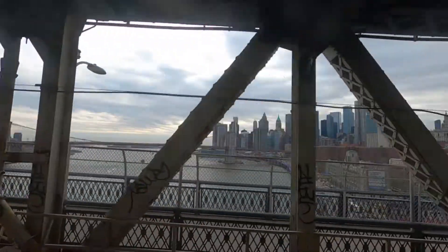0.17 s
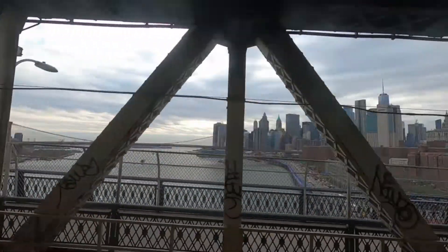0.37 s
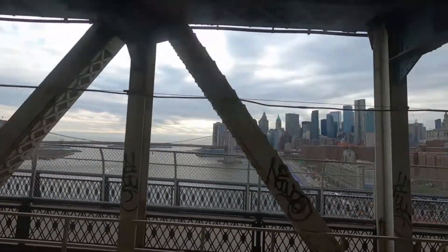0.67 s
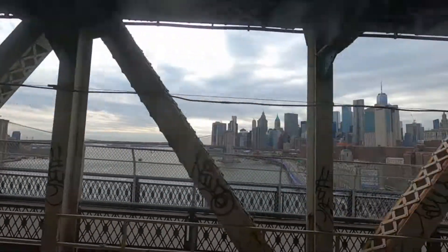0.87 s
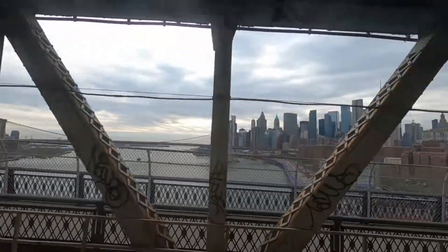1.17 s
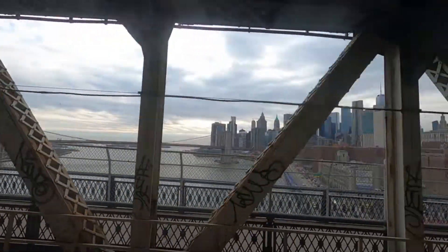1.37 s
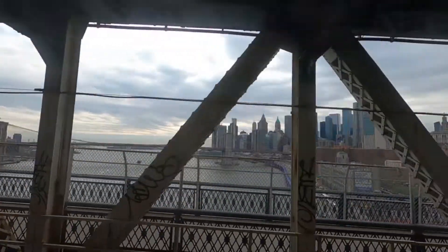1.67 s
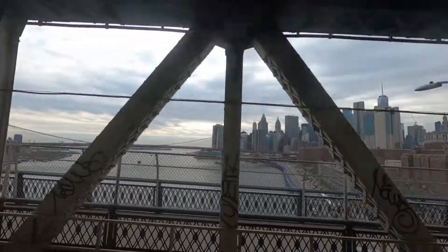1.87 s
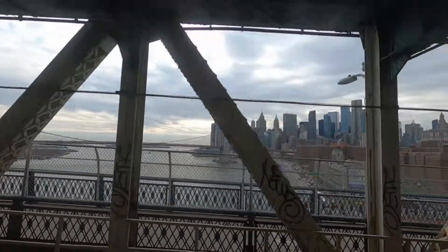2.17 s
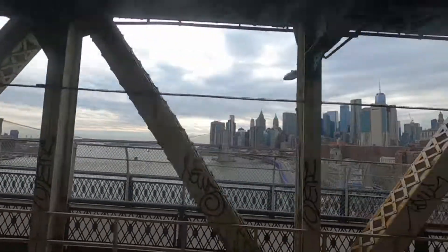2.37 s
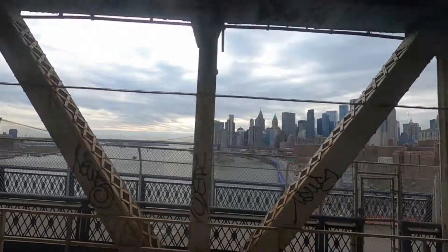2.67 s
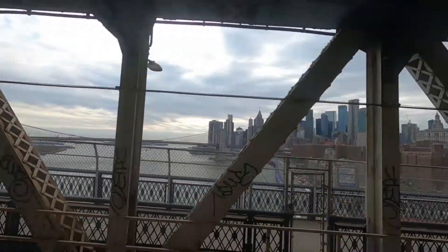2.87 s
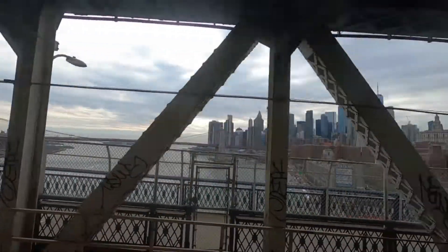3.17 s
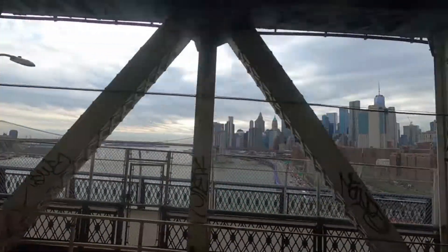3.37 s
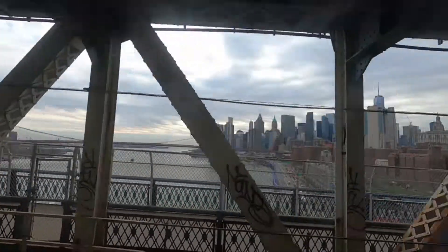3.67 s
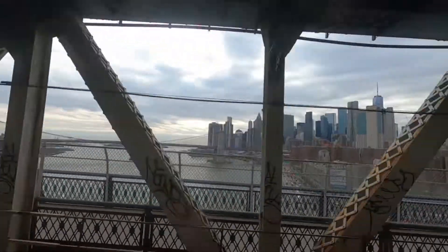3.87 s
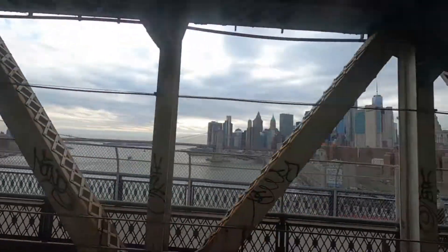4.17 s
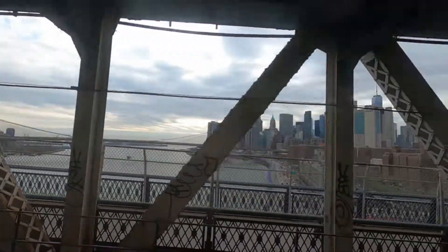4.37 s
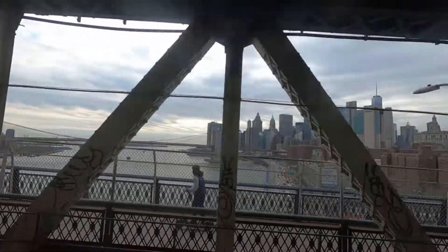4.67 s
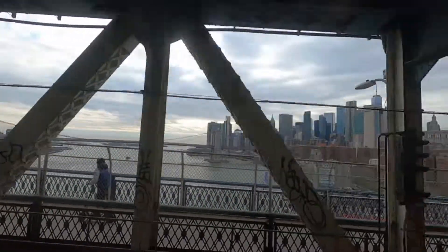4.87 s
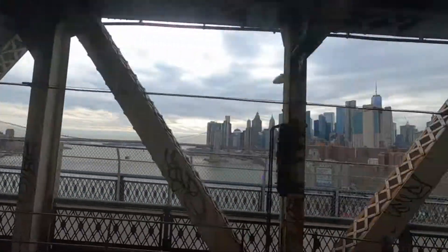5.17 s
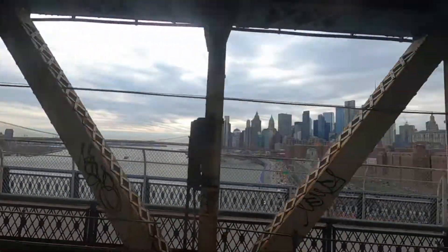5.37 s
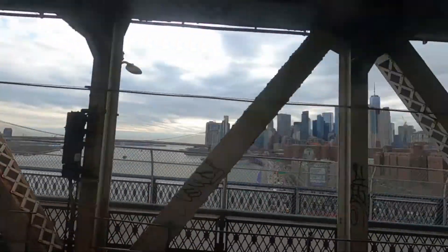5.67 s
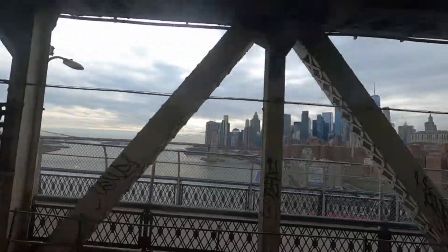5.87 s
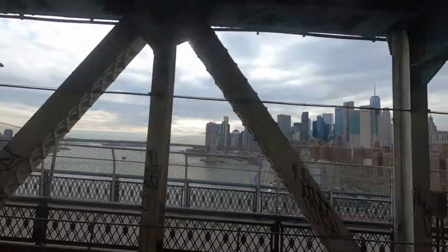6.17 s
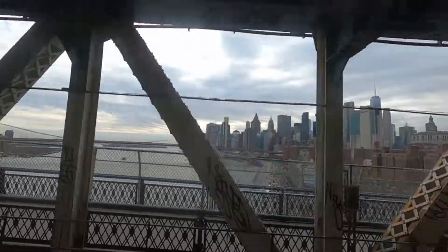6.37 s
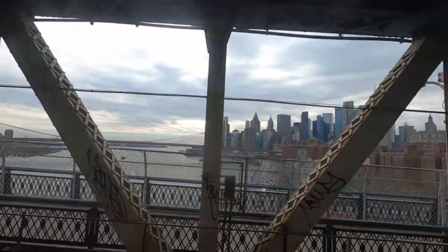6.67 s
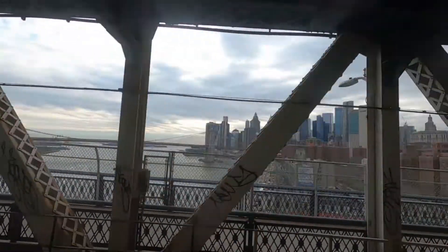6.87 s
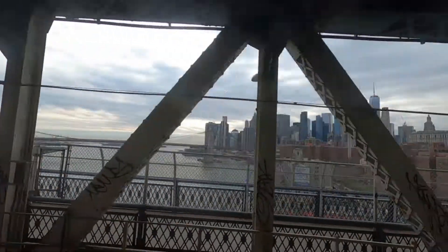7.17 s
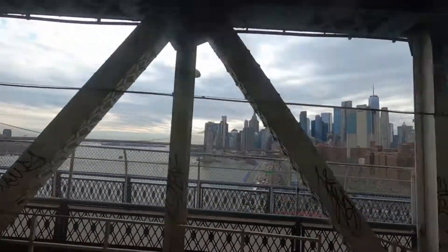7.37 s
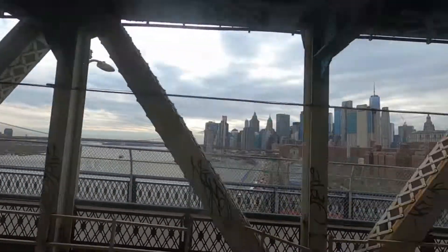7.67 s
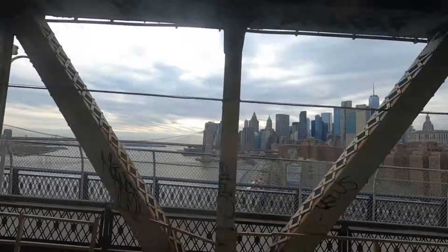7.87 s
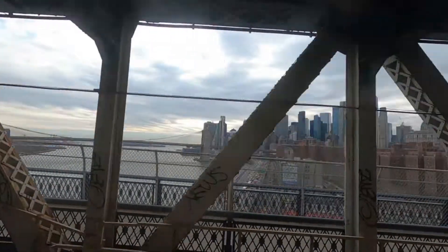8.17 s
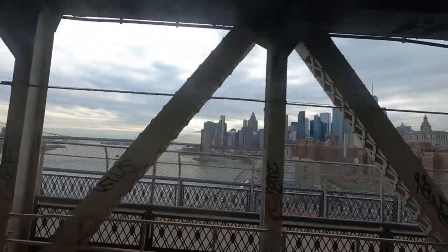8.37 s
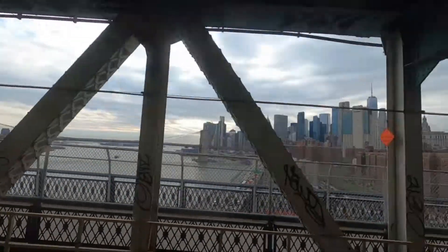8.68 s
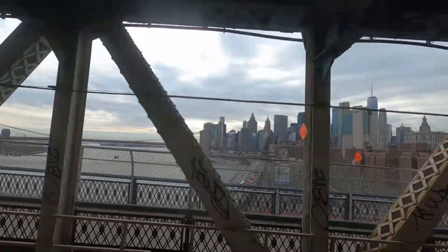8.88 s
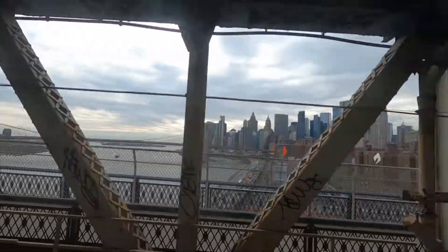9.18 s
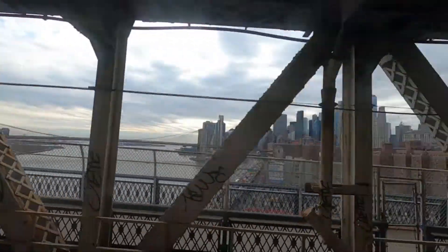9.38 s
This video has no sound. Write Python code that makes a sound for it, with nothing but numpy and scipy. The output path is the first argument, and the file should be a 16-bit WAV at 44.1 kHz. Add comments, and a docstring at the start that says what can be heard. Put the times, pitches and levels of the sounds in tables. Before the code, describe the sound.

A continuous, loud carriage ride recorded at the window. Heavy low rumble and a wavering panel hum lie behind a gritty steel-on-steel roar that swells every fraction of a second. Thuds and clashes mark rail joints around two to four, six and eight seconds; a few small metal clinks and faint flange squeaks pass. The train neither slows nor stops.

```python
"""Inside a subway car on a steel bridge, heard at the window while the train rolls steadily.
Farthest back, shaped noise makes the car body rumble and boom and one wall panel drone on its resonance.
Loose fittings chatter as random noise ticks and clink as clustered sines; a flange chirps as a falling sine
and squeaks as band noise. In front, noise coloured by wheel modes roars in surges and sings, and rail
joints knock as decaying noise."""
import sys
import numpy as np
from scipy import signal
from scipy.fft import rfft, irfft
from scipy.io import wavfile
from scipy.ndimage import uniform_filter1d, minimum_filter1d

SR = 44100
rng = np.random.default_rng(int(sys.argv[2]) if len(sys.argv) > 2 else 0)


def put_to_file(sound):
    """Save the sound as 16-bit audio at rate SR, in the file named by the first command-line argument."""
    columns = np.atleast_2d(sound).T  # one column per channel
    safe = np.clip(columns, -1, 1)
    whole_steps = np.round(safe * 32767)
    wavfile.write(sys.argv[1], SR, whole_steps.astype(np.int16))


N = 419832
HZ = np.fft.rfftfreq(N, 1 / SR)
TIME = np.arange(N) / SR


def gain_of(db):
    """Decibels to amplitude."""
    return 10 ** (np.asarray(db) / 20)


def evened(x):
    """Scales to an rms of 1."""
    return x / np.sqrt(np.mean(x ** 2) + 1e-20)


def follow(curve):
    """A curve of (t/s, value) rows at every sample."""
    return np.interp(TIME, *np.transpose(curve))


def read(points):
    """The columns of a table over frequency, at every bin, joined along log frequency."""
    hz, *columns = np.transpose(points)
    return [np.interp(np.log(HZ + 1), np.log(hz + 1), column) for column in columns]


def resonance(hz, width, bins=HZ):
    """Gain per bin of one steep resonance."""
    return 1 / (1 + (2 * (bins - hz) / width) ** 4)


def colour(points, modes=()):
    """Gain per bin: a broad shape with resonances standing on it."""
    peaks_db = sum(db / (1 + (2 * (HZ - hz) / width) ** 2) for hz, width, db in modes)
    return gain_of(read(points)[0] + peaks_db)


def drift(rate_hz):
    """Slow chance of rms 1, fading out above the rate."""
    return evened(irfft(rfft(rng.standard_normal(N)) / (1 + (HZ / rate_hz) ** 4), N))


def decay(age, t60):
    """Falls by 60 dB in t60 seconds."""
    return np.exp(-np.log(1000) * age / t60)


# the two microphone ports: [f/Hz, likeness 0-1, left lead/rad, left minus right/dB]
MICROPHONE_PORTS = [(30, .9965, 0, .6), (70, .998, -.01, .6), (130, .993, -.02, .9), (260, .977, -.06, 1.5),
                    (550, .9, -.12, 1.1), (850, .8, -.33, 1.5), (1450, .85, -.3, 1.7), (1700, .85, -.33, 3),
                    (2150, .66, -.55, 3.6), (2570, .22, -.8, -5.3), (2950, .54, -1.55, 0),
                    (3550, .47, -.9, 1), (4400, .26, -.8, -5.4), (5300, .1, -2, -2), (6000, .3, -3.7, -1),
                    (7000, .33, -3.4, 2.3)]


def in_cabin(gain, drive=None):
    """Colours two drives (noise if none is given) and spreads them over the ports: bass alike, treble diffuse."""
    near, diffuse = rfft(rng.standard_normal((2, N)) if drive is None else drive)
    same, lead, tilt_db = read(MICROPHONE_PORTS)
    same = np.clip(same, -1, 1)
    left = near * gain_of(tilt_db / 2)
    right = (same * near + np.sqrt(1 - same ** 2) * diffuse) * np.exp(-1j * lead)
    return evened(irfft(gain * np.array([left, right * gain_of(-tilt_db / 2)]), N))


def steadied(x, seconds, amount):
    """Evens out the chance swells of a vibration that is driven without pause."""
    power = (abs(signal.hilbert(x)) ** 2).mean(0)
    power = uniform_filter1d(power, max(int(seconds * SR), 1))
    return evened(x / (abs(power) + 1e-6) ** (np.clip(amount, 0, 1) / 2))


def wandering(x, share, rate_hz):
    """Lets all the resonances of a vibration slide a little up and down as the load shifts."""
    warped = TIME + np.cumsum(share * drift(rate_hz)) / SR
    return np.array([np.interp(warped, TIME, port, period=N / SR) for port in x])


# level of the deep rumble, before its trim: [t/s, level/dB]
RUMBLE_LEVEL = [(0, -20), (.24, -16.5), (.5, -19.5), (.95, -19.5), (1.17, -17), (1.82, -21), (2.15, -17),
                (2.5, -18), (3.1, -18), (3.65, -18.5), (4.05, -20), (4.38, -16.5), (4.68, -19), (4.85, -18),
                (5.3, -18), (5.78, -20.3), (6.1, -19.5), (6.45, -18.5), (6.95, -20), (7.27, -17.5),
                (7.48, -18.5), (8.12, -20.5), (8.32, -18.5), (8.75, -19.5), (9.2, -16), (9.42, -21)]
# the bridge shakes the car, panel boom before its trim: [t/s, level/dB]
SHAKE_LEVEL = [(0, -22.5), (.3, -22.5), (0.7, -22), (.82, -20), (1.05, -19.5), (1.17, -22), (1.34, -19),
               (1.55, -22.5), (2.1, -20.5), (2.55, -21.5), (3.1, -20.5), (3.29, -23), (3.45, -19.5),
               (3.7, -21.5), (4.05, -18.5), (4.42, -22.5), (5.12, -19.5), (5.25, -22.5), (5.45, -21),
               (5.58, -18), (5.82, -19), (6.1, -19), (6.25, -23), (6.45, -18.5), (6.68, -19), (6.98, -18),
               (7.26, -23.5), (7.42, -20), (7.8, -20), (8.2, -20), (8.5, -16.5), (8.68, -23), (8.95, -19.5),
               (9.5, -20.5)]
# broad colours of rumble and boom: [f/Hz, relative level/dB]
RUMBLE_COLOUR = [(5, -32.5), (14, -17), (26, 0.5), (55, -3), (95, -3), (120, -8), (200, -32), (600, -63)]
BOOM_COLOUR = [(60, -28.5), (105, -14), (130, -1), (200, -2), (275, -3), (355, -9), (410, -12),
               (510, -18.5), (750, -25.5), (1200, -32.5), (4000, -64)]
# modes of the cabin air and floor, then of wall and roof panels: [f/Hz, width/Hz, lift/dB]
AIR_AND_FLOOR_MODES = [(43.4, 5.7, 4.5), (75, 15, 5), (98, 12, 4)]
WALL_AND_ROOF_MODES = [(135.3, 6.2, 3), (166.6, 20, 5.5), (266, 27, 1.5), (308.2, 6, 5), (339.4, 15, 3),
                       (359, 17, 2.5)]


def car_body(rumble_trim_db=0.46, boom_trim_db=0.5, sway_db=-3.5, lump_db=0.72):
    """The track sways the whole car, shakes the cabin air into a rumble and the panels into a lumpy boom."""
    deep = colour(RUMBLE_COLOUR, AIR_AND_FLOOR_MODES)
    whole_car = 1 / (1 + (HZ / 56) ** 8)  # share of the power that is sway, below about 56 Hz
    sway = steadied(in_cabin(deep * np.sqrt(whole_car)), seconds=.11, amount=0.41)
    air = wandering(in_cabin(deep * np.sqrt(1 - whole_car)), share=.018, rate_hz=2.5)
    air = steadied(air, seconds=0.079, amount=0.32)
    rumble = evened(gain_of(sway_db) * sway + air)
    panels = in_cabin(colour(BOOM_COLOUR, WALL_AND_ROOF_MODES))
    panels = wandering(panels, share=.012, rate_hz=2.5)
    boom = steadied(panels, seconds=0.068, amount=0.45)
    rumble_db = follow(RUMBLE_LEVEL) + rumble_trim_db
    boom_db = follow(SHAKE_LEVEL) + boom_trim_db + lump_db * drift(5.0)
    return rumble * gain_of(rumble_db) + boom * gain_of(boom_db)


# the loosest wall panel drones in surges: [t/s, level/dB]
DRONE_LEVEL = [(0, -32), (0.7, -34), (0.85, -21.5), (1.15, -33.5), (2.25, -37.5), (2.48, -30), (3.12, -27),
               (3.3, -38), (3.45, -27.5), (4.15, -26.5), (4.38, -38), (4.85, -29), (5.42, -33), (5.58, -24),
               (6.05, -25.5), (6.25, -32), (6.75, -28.5), (7.4, -35), (8.35, -25), (9.1, -28.5),
               (9.5, -27.5)]
DRONE_HZ, DRONE_WIDTH_HZ = 219.3, 13.3


def drone(steadiness=.7):
    """One panel resonance, shaken without pause, hums at a fixed pitch while its level surges."""
    mode = in_cabin(resonance(DRONE_HZ, DRONE_WIDTH_HZ))
    return steadied(mode, seconds=.12, amount=steadiness) * gain_of(follow(DRONE_LEVEL))


# loose metal parts clinking: [t/s, f/Hz, level before rise and decay/dB, t60/s]
LOOSE_PART_CLINKS = [(4.48, 2480, -27, .16), (4.565, 1670, -30, 0.16), (4.972, 2680, -21.5, .09)]


def clinks(rise_s=0.0036, width_hz=45, count=5):
    """A loose part strikes once and rings briefly on a cluster of close modes."""
    out = np.zeros((2, N))
    age = np.arange(SR // 2) / SR
    for s, hz, db, t60 in LOOSE_PART_CLINKS:
        cluster_hz = hz + width_hz * np.linspace(-1, 1, count)[:, None]
        cycles = cluster_hz * age + rng.random((2, count, 1))
        ring = evened(np.sin(2 * np.pi * cycles).sum(1))
        envelope = (1 - np.exp(-age / rise_s)) * decay(age, t60)
        start = int(s * SR)
        out[:, start:start + len(age)] += gain_of(db) * ring * envelope
    return out


# bright colour of struck steel, shared by the chatter and the joints: [f/Hz, relative level/dB]
CLASH_COLOUR = [(500, -22), (1600, 0.5), (2700, -2), (4400, -7.5), (6000, -16), (8000, -19), (13000, -28)]
CHATTER_PER_S, CHATTER_DB = 54, -48.5  # mean tap rate, rms level


def chatter(contact_db, power_decay_s=0.0093, spread_db=3, growth=1.5):
    """Loose fittings tap at random, more strongly when the wheels grind."""
    tap_db = spread_db * np.minimum(rng.exponential(1, N), 3)
    taps = (rng.random(N) < CHATTER_PER_S / SR) * gain_of(tap_db)
    power = signal.lfilter([1], [1, -np.exp(-1 / (power_decay_s * SR))], taps ** 2)
    ticks = in_cabin(colour(CLASH_COLOUR), np.sqrt(power) * rng.standard_normal((2, N)))
    return gain_of(CHATTER_DB) * evened(ticks * gain_of(growth * contact_db))


# three quick slips of a flange that make one falling chirp: [t/s, length/s, level at the crest/dB]
FLANGE_SLIPS = [(5.338, 0.015, -29), (5.355, 0.022, -32), (5.376, 0.033, -38.5)]
CHIRP_HZ, CHIRP_SAG_HZ_PER_S = 3395, 850


def chirp(waver_hz=8, pan_db=2, bite_hz=22, bite_s=.014):
    """A flange sticks and slips, ringing one wheel mode that starts rough, clears and sags in pitch."""
    age = np.clip(TIME - FLANGE_SLIPS[0][0], 0, 1)
    roughness_hz = waver_hz + bite_hz * np.exp(-age / bite_s)
    hz = CHIRP_HZ - CHIRP_SAG_HZ_PER_S * age + roughness_hz * drift(150)
    slips = np.zeros(N)
    for s, length, db in FLANGE_SLIPS:
        slips += gain_of(db) * np.sin(np.pi * np.clip((TIME - s) / length, 0, 1))
    tone = np.sqrt(2) * np.sin(2 * np.pi * np.cumsum(hz) / SR)
    return slips * tone * gain_of([[pan_db / 2], [-pan_db / 2]])


# flanges rubbing on the rail: [t/s, length/s, f/Hz, width/Hz, level/dB, left minus right/dB]
FLANGE_SQUEAKS = [(0.764, 0.4, 6000, 2200, -53, 4), (2.55, 0.32, 6100, 1300, -53, 3),
                  (5.455, .09, 6130, 300, -52, 3), (5.677, 0.11, 6100, 600, -50, -1),
                  (8.857, 0.2, 4670, 1800, -48, -7)]


def squeaks():
    """A rubbing flange hisses in a band of high wheel modes."""
    out = np.zeros((2, N))
    bins = np.fft.rfftfreq(SR, 1 / SR)
    for s, length, hz, width, db, pan_db in FLANGE_SQUEAKS:
        window = signal.windows.tukey(int(length * SR), .7)
        ring = irfft(rfft(rng.standard_normal((2, SR))) * resonance(hz, width, bins))
        ring = np.array([evened(port) for port in ring[:, :len(window)]])
        start = int(s * SR)
        port_gains = gain_of([[db + pan_db / 2], [db - pan_db / 2]])
        out[:, start:start + len(window)] += ring * window * port_gains
    return out


# wheels knocking over rail joints, before rise and decay: [t/s, clash level/dB, thud level/dB, t60/s]
RAIL_JOINTS = [(2.14, -33, -33, 0.25), (3.115, -31, -19.5, 0.25), (3.962, -22.5, -23, 0.18),
               (4.24, -33, -18.5, 0.23), (6.035, -40, -32, .3), (6.28, -29, -39, 0.34),
               (8.18, -31, -18, 0.45), (8.415, -32, -34, 0.22)]
# dull colour of a knock in the floor: [f/Hz, relative level/dB]
THUD_COLOUR = [(70, -11), (170, 7), (350, 1), (550, -3.5), (900, -3.5), (1400, -10), (2500, -18),
               (6000, -52)]
# steel that rings under a knock: [f/Hz, width/Hz, lift/dB]
KNOCKED_STEEL_MODES = [(775, 30, 3.5), (907, 79, 3), (1350, 35, 10), (1640, 60, 6.5), (1800, 54, 2),
                       (2100, 40, 4.5), (2380, 35, 5), (2720, 35, 3.5)]


def joints(rise_s=0.0069):
    """Each joint sets off a clash of steel and a thud in the floor that die away through the car."""
    clash, thud = np.zeros((2, N))
    for s, clash_db, thud_db, t60 in RAIL_JOINTS:
        age = np.maximum(TIME - s, 0)
        blow = (1 - np.exp(-age / rise_s)) * decay(age, t60)
        clash += gain_of(clash_db) * blow
        thud += gain_of(thud_db) * blow
    steel = in_cabin(colour(CLASH_COLOUR, KNOCKED_STEEL_MODES))
    floor = in_cabin(colour(THUD_COLOUR, KNOCKED_STEEL_MODES))
    return clash * steel + thud * floor


# wheel modes that sing out by turns: [f/Hz, width/Hz, level above contact and singing lift/dB]
SINGING_MODES = [(1478, 57, -19.5), (1616, 30, -14), (1741, 79, -12.5), (1873, 90, -16.5), (2567, 80, -19)]
# how freely the wheel modes sing: [t/s, lift/dB]
SINGING_LIFT = [(0, -4), (0.2, 4), (0.4, -4), (1.12, 0), (1.55, -0.5), (2.3, -2), (2.52, 1), (2.95, -9),
                (3.12, 0.5), (3.6, -4), (4.12, -7), (4.65, 0), (5.1, 0), (5.4, -5), (6, 2.5), (6.22, -7.5),
                (6.45, 3.5), (7, -1), (7.7, -1), (8.3, -2), (8.58, 4.5), (8.8, -0.5), (9.08, 1), (9.25, -2),
                (9.5, 4)]


def singing(contact_db, spread_db=5.0, turn_hz=9, pan_db=2.6):
    """The rolling contact feeds now one wheel mode, now another, so the metallic ringing shifts in pitch."""
    ring = np.zeros(N)
    for hz, width, db in SINGING_MODES:
        mode = irfft(rfft(rng.standard_normal(N)) * resonance(hz, width), N)
        turns_db = spread_db * np.minimum(drift(turn_hz), 1.5)
        ring += gain_of(db) * evened(mode * gain_of(turns_db))
    ring = wandering(ring[None], share=.022, rate_hz=7)
    level_db = contact_db + follow(SINGING_LIFT)
    return ring * gain_of(level_db) * gain_of([[pan_db / 2], [-pan_db / 2]])


# how hard the wheels grind on ordinary stretches of rail, before the roar's trim: [t/s, level/dB]
ORDINARY_CONTACT = [(0, -32.5), (0.6, -33), (1.42, -31), (1.56, -36), (1.72, -31.5), (2.1, -31.5),
                    (2.35, -33), (2.55, -30), (2.85, -30.5), (3.5, -31.5), (4.3, -29.5), (4.7, -32.5),
                    (5.38, -32), (5.9, -30), (6.12, -30.5), (6.2, -31.5), (6.3, -30), (7.15, -32),
                    (7.45, -35), (8.05, -32.5), (9.5, -33.5)]
# rough stretches, each a surge of the roar before blur and growth: [t/s, length/s, lift/dB, extra hiss/dB]
ROUGH_STRETCHES = [(0.058, 0.049, 1.5, -0.5), (0.167, .25, 1, -1.5), (0.757, 0.06, 2.5, 2),
                   (0.896, .3, 1, 0), (1.643, 0.044, 1.5, 0), (2.107, 0.068, 3.5, -2),
                   (2.426, 0.091, 2, -1.5), (2.642, 0.17, 1.8, -2), (3.067, 0.12, 2, 1),
                   (3.303, 0.27, 1, 0.5), (3.942, 0.065, 3, -0.5), (4.216, 0.075, 2, -4),
                   (4.782, 0.049, 3, -3), (4.899, 0.15, 3.5, -1), (5.159, 0.095, 2.5, 1),
                   (5.423, 0.18, 2.5, 2.5), (5.665, 0.17, 2.5, 0.5), (6.003, 0.064, 4.5, -2.5),
                   (6.255, 0.12, 2.5, -4.5), (6.517, 0.1, 3.5, -3), (6.805, 0.1, 1, -0.5),
                   (7.131, 0.083, 3, -2.5), (8.133, .16, 4, -5.5), (8.374, .15, 5, -4),
                   (8.755, 0.045, 2.5, -3), (8.911, .24, 4, -3), (9.2, 0.12, 3, -3.5)]
SURGE_RISE_S, SURGE_FALL_S, SURGE_BLUR_S = 0.021, 0.079, 0.024


def grinding():
    """Contact level and extra hiss in dB: each rough stretch shifts them quickly, holds them, lets them return."""
    contact_db, hiss_db = follow(ORDINARY_CONTACT), np.zeros(N)
    for start, length, lift_db, extra_db in ROUGH_STRETCHES:
        rise = (TIME - start) / SURGE_RISE_S
        fall = 1 - (TIME - start - length) / SURGE_FALL_S
        surge = np.clip(np.minimum(rise, fall), 0, 1)
        contact_db += lift_db * surge
        hiss_db += extra_db * surge
    return uniform_filter1d(contact_db, max(int(SURGE_BLUR_S * SR), 1)), hiss_db


# broad colour of the roar: [f/Hz, relative level/dB]
ROAR_COLOUR = [(150, -19.5), (450, -0.5), (650, 0), (850, -0.5), (1200, -2.5), (1650, 0.5), (2250, -1),
               (2700, -0.5), (3400, -7), (4400, -13.5), (5400, -21), (6200, -24.5), (8000, -32),
               (13000, -38.5)]
# ringing of wheels and rails, with two hollows between the modes: [f/Hz, width/Hz, lift/dB]
WHEEL_AND_RAIL_MODES = [(800, 25, 1.5), (853, 36, -4.5), (1450, 56, 2), (1730, 190, 1.3), (2190, 60, -2),
                        (2460, 190, 1.5), (2930, 100, 2.3)]


def rolling(contact_db, hiss_db, roar_trim_db=2.5, low_growth=.72, high_growth=1.94, flutter_db=0.37):
    """Rough steel rolls on steel; harder contact is louder and also brighter."""
    usual_db = contact_db.mean()
    surge_db = contact_db - usual_db + flutter_db * drift(35)
    roar = rfft(in_cabin(colour(ROAR_COLOUR, WHEEL_AND_RAIL_MODES)))
    low = 1 / (1 + (HZ / 1100) ** 4)
    high = 1 - 1 / (1 + (HZ / 3700) ** 4)
    bands = [(low, low_growth * surge_db),
             (1 - low - high, surge_db),
             (high, high_growth * surge_db + hiss_db)]
    surging = sum(irfft(roar * band, N) * gain_of(db) for band, db in bands)
    return gain_of(usual_db + roar_trim_db) * surging


def scene():
    """Everything heard at the window."""
    contact_db, hiss_db = grinding()
    background = car_body() + drone()
    fittings = clinks() + chatter(contact_db)
    flanges = chirp() + squeaks()
    wheels = joints() + singing(contact_db) + rolling(contact_db, hiss_db)
    return background + fittings + flanges + wheels


STEP_HZ, EDGE_HZ = 8050, 13800  # where the treble steps down, where it ends


def record(dry, air_db=-16):
    """A limiter holds down the highest peaks; the treble steps down, then ends."""
    ceiling, size = .61, 400  # full scale = 1, window in samples
    needed = np.minimum(1, ceiling / (abs(dry).max(0) + 1e-9))
    limited = dry * uniform_filter1d(minimum_filter1d(needed, size), size)
    main, full = (signal.firwin(301, hz, window=("kaiser", 8), fs=SR) for hz in (STEP_HZ, EDGE_HZ))
    response = main + gain_of(air_db) * (full - main)
    return signal.oaconvolve(limited, response[None], "same")


dry = scene()
out = record(dry)
put_to_file(out)
```